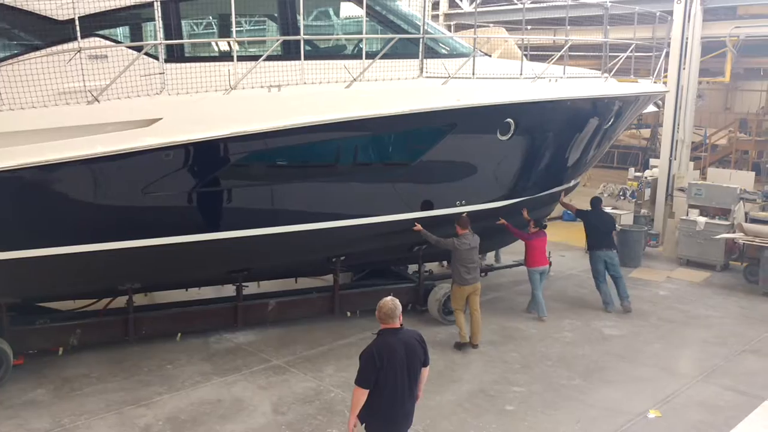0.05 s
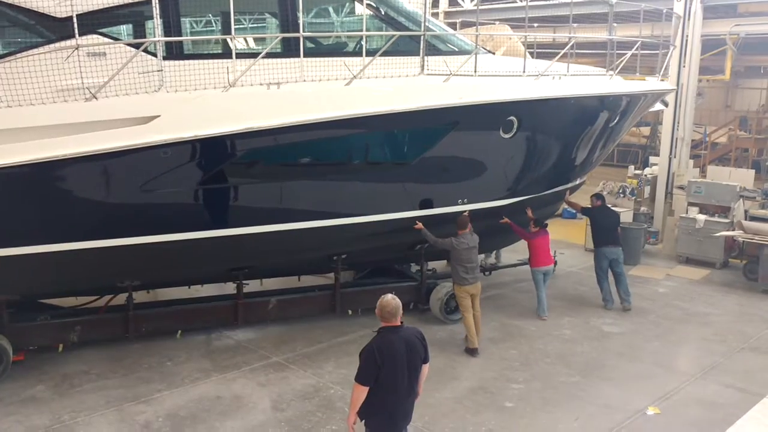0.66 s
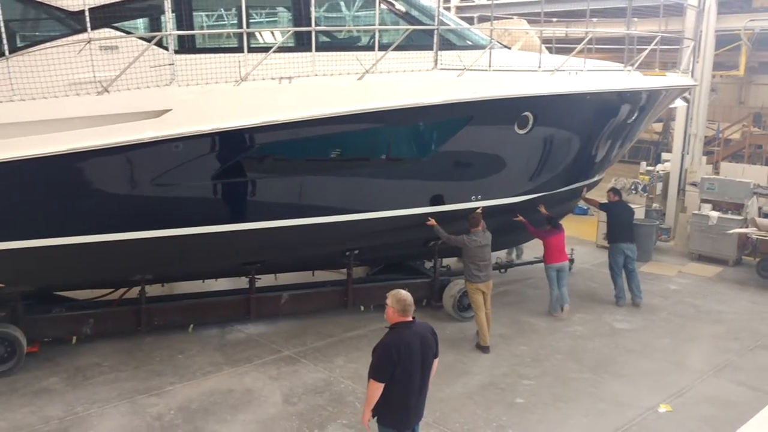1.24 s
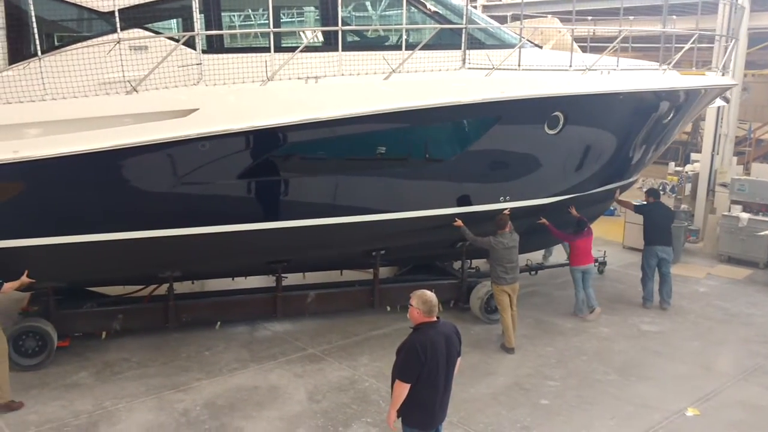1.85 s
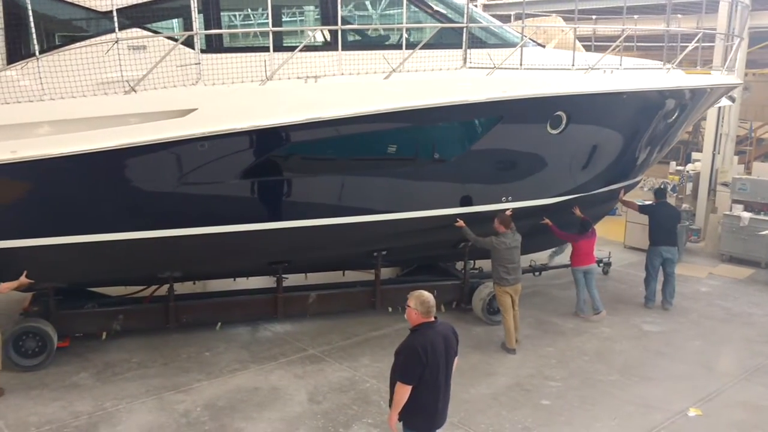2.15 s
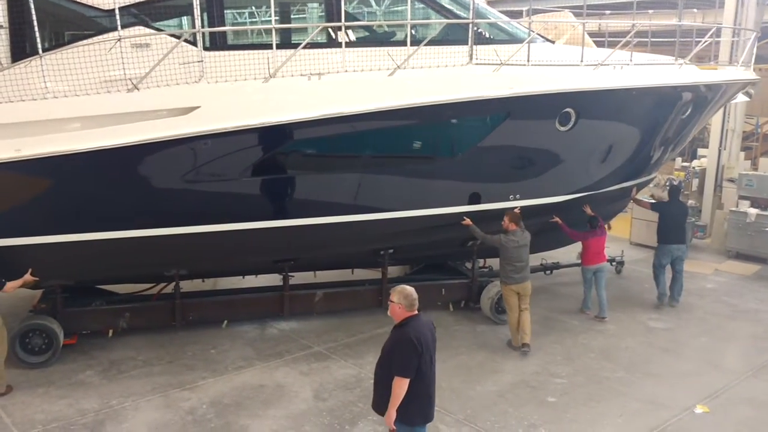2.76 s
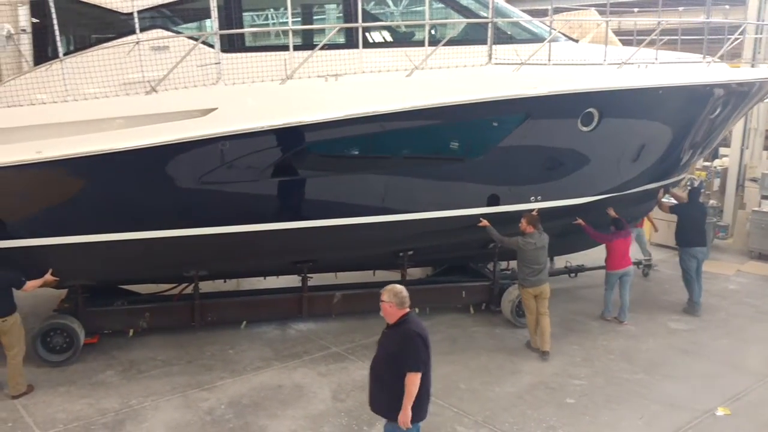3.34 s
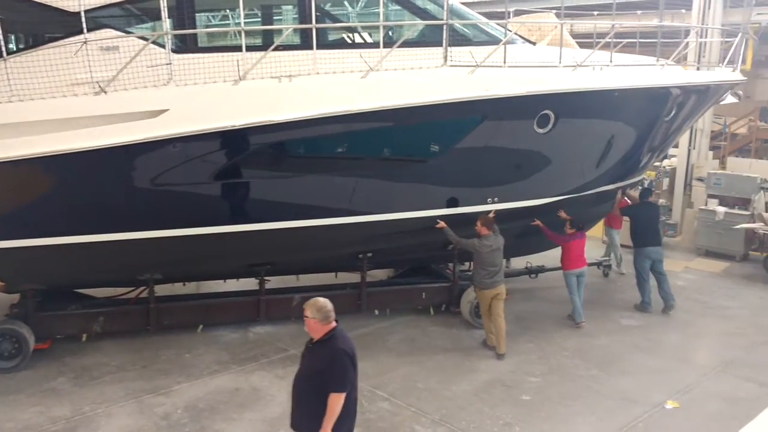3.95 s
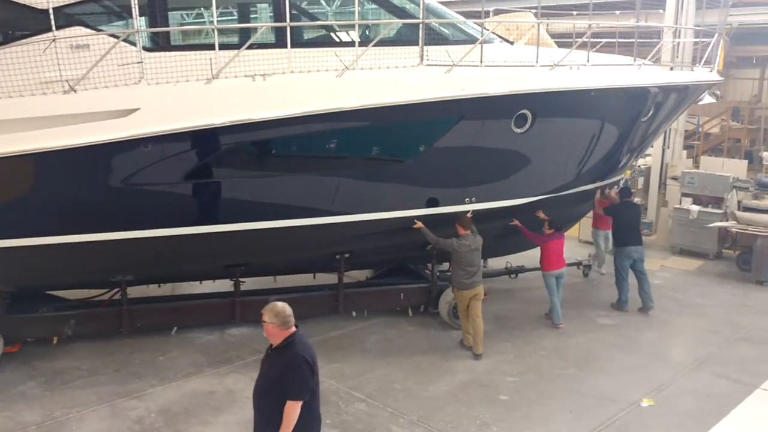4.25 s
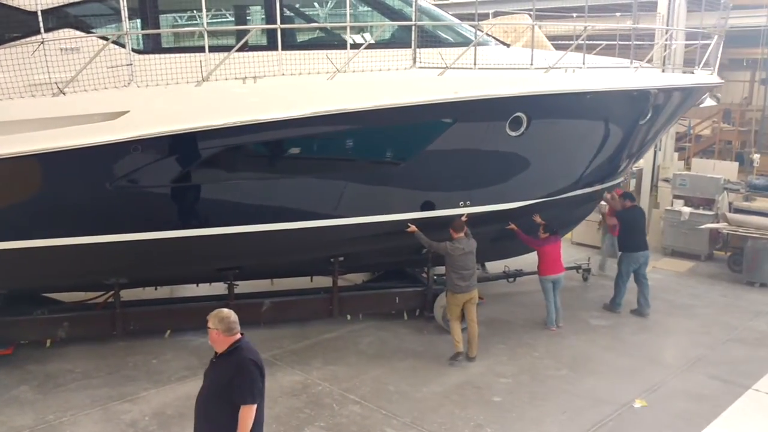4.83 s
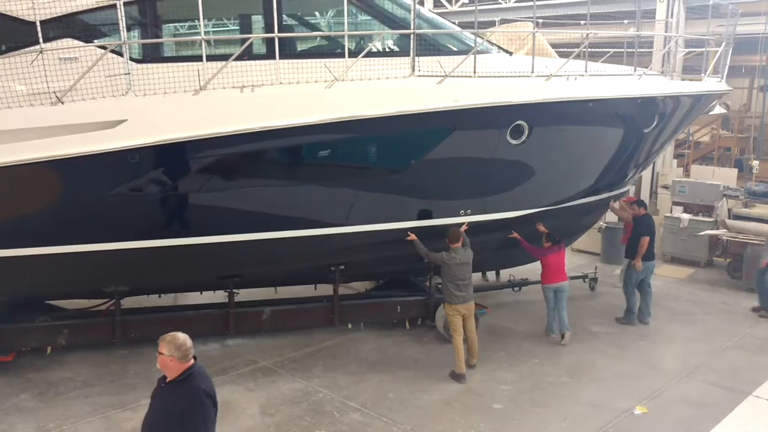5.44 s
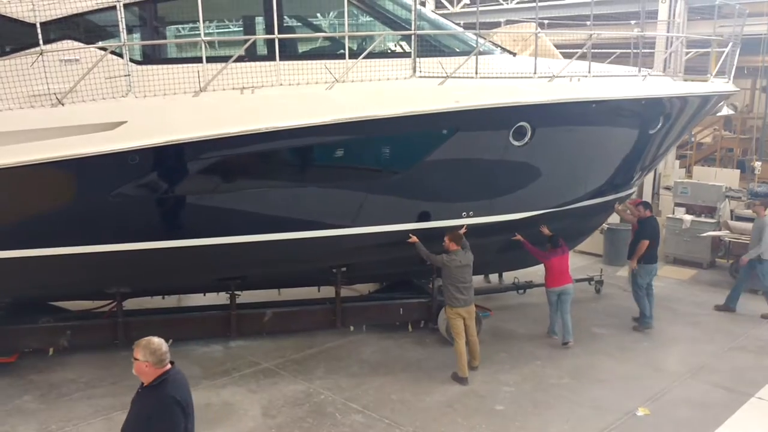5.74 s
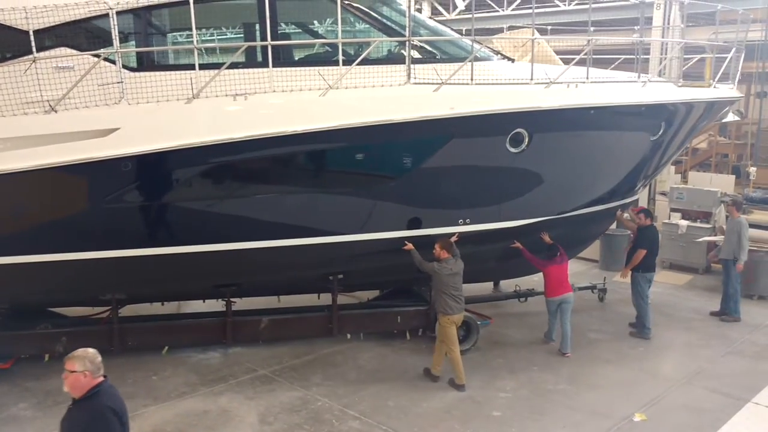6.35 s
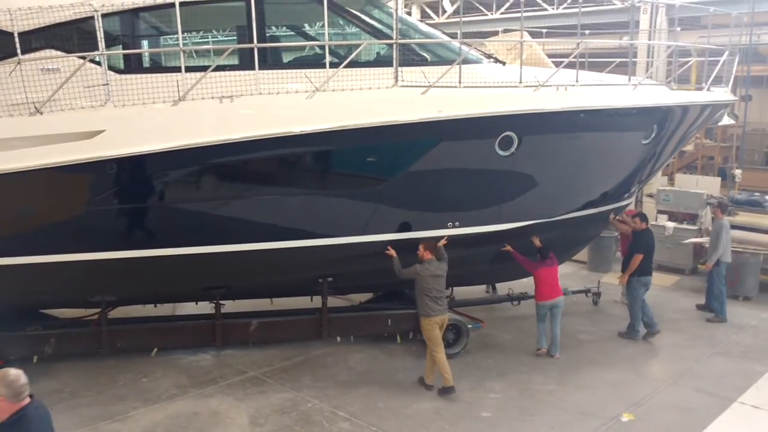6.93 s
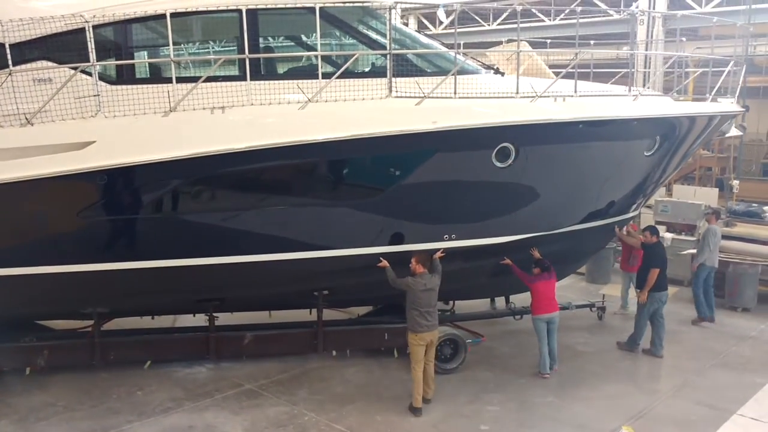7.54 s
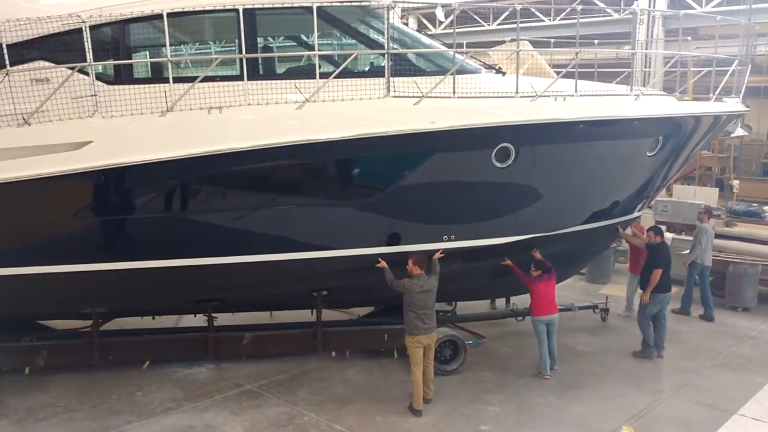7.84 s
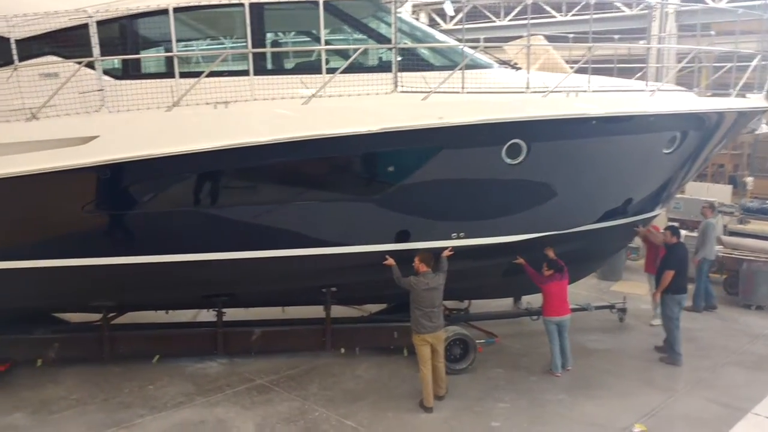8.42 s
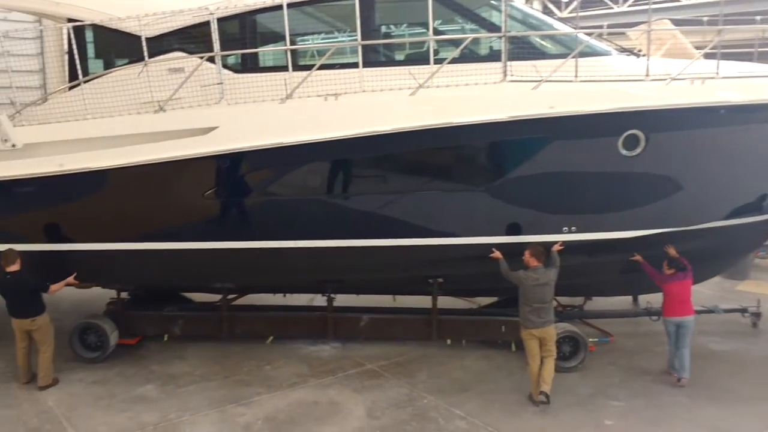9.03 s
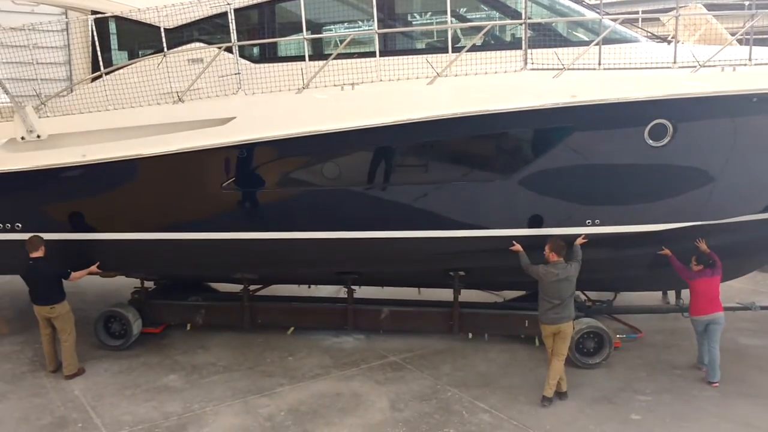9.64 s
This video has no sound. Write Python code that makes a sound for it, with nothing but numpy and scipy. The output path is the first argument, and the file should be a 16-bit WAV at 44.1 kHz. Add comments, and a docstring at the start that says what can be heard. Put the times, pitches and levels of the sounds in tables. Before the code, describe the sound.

A continuous bright hiss and hollow rush of air escapes beneath a boat's hull, with a few brief spurts and an early rumble.

```python
"""A factory floor, heard through a phone's two microphone ports as a large boat floats by on air casters.
Compressed air leaks from under their skirts: a hollow roar from the gap below the hull, a bright hiss,
at first the low rumble of a fluttering skirt, now and then a spurt or the squeak of a seal. Farther off
the hall drones and motors hum. The ports spread the hiss wide, and the phone's gain control ducks
after the sharpest sounds."""
import sys
import numpy as np
from scipy import signal
from scipy.fft import rfft, irfft, next_fast_len
from scipy.io import wavfile
from scipy.ndimage import uniform_filter1d, minimum_filter1d

SR = 44100
rng = np.random.default_rng(int(sys.argv[2]) if len(sys.argv) > 2 else 0)


def unload_audio(sound):
    """Save the sound as a 16-bit wav file, at the path given as the first command line argument."""
    columns = np.transpose(np.atleast_2d(sound))
    # keep every value between -1 and 1, then stretch to whole-number steps
    steps = np.round(np.clip(columns, -1, 1) * 32767)
    wavfile.write(sys.argv[1], SR, steps.astype(np.int16))


N = 426888
TIME, FREQ = np.arange(N) / SR, np.maximum(np.arange(N // 2 + 1) * SR / N, 1)
TOP_HZ = 15350  # upper edge of the phone's range


def undb(db):
    """Decibels to gain."""
    return np.exp(np.asarray(db) * np.log(10) / 20)


def over_time(rows, column=1):
    """One column of a curve at every sample."""
    rows = np.array(rows)
    return np.interp(TIME, rows[:, 0], rows[:, column])


def over_freq(rows):
    """A spectrum's level at every frequency."""
    rows = np.array(rows)
    return np.interp(np.log(FREQ), np.log(rows[:, 0]), rows[:, 1])


def bell(x, centre, width):
    """A smooth hump of height 1 and the given width at half height."""
    return np.exp2(-np.minimum((2 * (x - centre) / width) ** 2, 60))


def walk(rate):
    """Random levels, rate a second, joined by straight lines; spread near 1."""
    return np.interp(TIME * rate, np.arange(512), 1.2 * rng.standard_normal(512))


# The microphone ports swing in and out of phase along the spectrum. Each row: frequency in Hz,
# likeness from -1 opposed to 1 alike (held flat beyond), lead of the right port up to the next row.
PORT_PHASE = [(30, .3, .5), (470, .5, 0), (700, .9, 0), (1330, 1.0, .3), (2515, -1.12, -.2),
              (3690, 1.03, .1), (4960, -.985, -.2), (6220, .86, .33), (7620, -.89, -.36), (8900, .95, .46),
              (10030, -.97, -.47), (11130, .92, .3), (12450, -.85, 0), (13750, .5, 0), (15250, -.6, 0)]
# Balance at the phone. Each row: frequency in Hz, left minus right in dB.
PORT_BALANCE = [(70, 5), (115, 0), (170, 2.2), (300, -.9), (800, .2), (1400, 0), (1800, -1.2), (2300, 0),
                (3800, .2), (4600, 1.3), (5400, -2.2), (6000, -.7), (6900, -2.5), (8500, -2), (9300, -.2),
                (11600, -2.3), (13000, -.4)]


def noise_at_ports():
    """Spectrum of white noise, 0 dB per Hz, as it reaches the left and right port."""
    left, unrelated = rfft(rng.standard_normal((2, N))) * np.sqrt(SR / 2)
    hz, alike, lead = np.array(PORT_PHASE).T
    part, row = np.modf(np.interp(FREQ, hz, np.arange(len(hz))))
    eased_row = row + (1 - np.cos(np.pi * part)) / 2
    swing = np.clip(np.interp(eased_row, np.arange(len(hz)), alike), -.99997, .99997)
    # the air comes from one side, which turns the phase in between
    likeness = swing + 1j * lead[row.astype(int)] * np.sin(np.pi * part) * np.sqrt(1 - swing ** 2)
    right = likeness * left + np.sqrt(np.maximum(1 - abs(likeness) ** 2, 0)) * unrelated
    return np.array([left, right]) * undb(np.outer([.5, -.5], over_freq(PORT_BALANCE)))


# Room tone, all around the phone. Each row: frequency in Hz, level in dB per Hz.
HALL_SPECTRUM = [(20, -100), (60, -81), (125, -73.5), (200, -68.5), (400, -70.5), (600, -75), (1500, -104)]


def hall_drone():
    """The steady low noise of the hall."""
    return irfft(noise_at_ports() * undb(over_freq(HALL_SPECTRUM)), N)


# Motors farther off in the hall.
# Each row: loudest moment in seconds, length in seconds, pitch in Hz, peak level in dB.
MOTOR_RUNS = [(4.6, 7, 118.5, -55), (6.2, 3.4, 203, -50.5), (7.58, 0.9, 291, -44.5), (4.2, 1.3, 398, -48.5),
              (5.7, 1, 398, -45.5)]


def motors(waver_db=1.0, waver_hz=0.59):
    """Each motor swells and fades, humming faintly and unevenly."""
    out = 0
    for at, length, hz, db in MOTOR_RUNS:
        tone = np.sin(2 * np.pi * np.cumsum(hz + waver_hz * walk(9)) / SR)
        out = out + undb(db + waver_db * walk(1.95)) * bell(TIME, at, length) * tone
    return out


def reflections(x, echo_db=-18, wander_s=0.00025, count=6):
    """Echoes off hull and floor comb the sound finely; the combs slide as boat and phone move."""
    bright = signal.sosfilt(signal.butter(1, 900, "high", fs=SR, output="sos"), x)
    out = x
    for lag_s in np.geomspace(.006, .024, count):
        then = TIME - lag_s - wander_s * walk(.7)
        out = out + undb(echo_db) * np.array([np.interp(then, TIME, side, left=0) for side in bright])
    return out


# Resonances between hull and floor, heard from outside the gap. Each row: first and last centre
# in Hz, width in Hz, first and last lift in dB.
GAP_RESONANCES = [(116.6, 120, 15, 4, 3), (175, 194, 73, 0.5, 2), (412, 387, 89, 5, 3.5),
                  (735, 726, 84, 2, 3), (825, 830, 60, -0.5, -0.8), (931, 937, 123, 5, 4),
                  (1085, 1085, 69, -1.5, -1.5), (1307, 1240, 163, 5.5, 3), (1476, 1400, 170, 3, -0.8),
                  (1800, 1850, 140, 3.5, 0)]


def under_hull(x):
    """The gap rings; as the boat glides, its resonances fade from their first to their last shape."""
    first_db = sum(db * bell(FREQ, hz, width) for hz, _, width, db, _ in GAP_RESONANCES)
    last_db = sum(db * bell(FREQ, hz, width) for _, hz, width, _, db in GAP_RESONANCES)
    spectrum, travel = rfft(x), TIME / TIME[-1]
    first, last = irfft(spectrum * undb(first_db), N), irfft(spectrum * undb(last_db), N)
    return (1 - travel) * first + travel * last


# A skirt fluttering down at the floor. Each row: frequency in Hz, level in dB per Hz.
SKIRT_SPECTRUM = [(30, -99), (75, -83), (110, -63.5), (170, -60.5), (250, -55), (340, -59), (430, -74),
                  (560, -80), (1000, -99)]
# How strongly it flutters. Each row: time in seconds, gain in dB.
SKIRT_FLUTTER = [(0, 6.5), (.12, -4), (.5, -1.5), (.9, 1), (1.4, 2), (1.75, 1), (2.05, -2), (2.4, -2),
                 (2.7, -6.5), (3.1, -20), (3.7, -10.5), (4.1, -22), (6.4, -22), (6.9, -10), (7.3, -17),
                 (8.4, -23), (9.68, -13)]


def skirt_rumble():
    """A skirt flutters on the floor and rumbles, mostly in the first seconds."""
    rumble = irfft(noise_at_ports() * undb(over_freq(SKIRT_SPECTRUM)), N)
    return rumble * undb(over_time(SKIRT_FLUTTER))


# Rubber seals, a touch left of the microphone. Each row: middle in seconds, glide length in seconds,
# start and end pitch in Hz, peak level in dB.
SEAL_SQUEAKS = [(2.694, 0.014, 12000, 11200, -24.5), (2.708, .024, 13300, 12300, -25.5),
                (5.884, .005, 10900, 10500, -20), (5.906, 0.0126, 8850, 7900, -13.5),
                (5.919, 0.013, 8300, 7700, -21)]


def squeaks(right_lag_s=.00003):
    """A seal snaps against the floor and gives a tiny falling whistle."""
    out = 0
    for at, length, start_hz, end_hz, db in SEAL_SQUEAKS:
        hz = np.interp(TIME, [at - length / 2, at + length / 2], [start_hz, end_hz])
        turns = np.cumsum(hz) / SR - np.outer([0, right_lag_s], hz)
        out = out + undb(db) * bell(TIME, at, length / 2) * np.sin(2 * np.pi * turns)
    return out


# Short spurts and longer leaks at floor level. Each row: middle in seconds, length in seconds,
# centre in Hz, width in Hz, peak level in dB per Hz.
SKIRT_JETS = [(.6, 1.1, 10700, 1600, -64.5), (2.447, 0.11, 6940, 4000, -70), (2.68, .07, 12300, 3500, -68),
              (2.8, 1.9, 6230, 1100, -65.5), (3.017, 0.028, 6100, 5000, -64),
              (3.21, 0.021, 6040, 5000, -61.5), (4.39, 0.04, 8000, 3000, -63),
              (5.172, 0.047, 6200, 4550, -61), (5.87, 0.087, 10300, 3000, -66),
              (5.895, 0.051, 6500, 4000, -65), (7.074, .04, 9500, 4000, -65),
              (7.78, 0.048, 7000, 7000, -61.5), (8.085, 0.048, 960, 490, -56),
              (8.145, 0.049, 6700, 4800, -54), (8.153, 0.036, 5800, 300, -54),
              (8.145, 0.032, 13700, 700, -73), (8.25, 0.062, 6200, 3540, -54), (9.4, .7, 8400, 1400, -65)]


def spurts():
    """Where a skirt lifts, air jets through a narrow opening, sometimes close to whistling."""
    air, out = irfft(noise_at_ports(), N), np.zeros((2, N))
    for at, length, hz, width, db in SKIRT_JETS:
        near = np.flatnonzero(abs(TIME - at) < 2 * length)
        size = next_fast_len(len(near))
        freq = np.maximum(np.fft.rfftfreq(size, 1 / SR), 1)
        band = bell(np.log(freq / hz), 0, width / hz)
        puff = irfft(rfft(air[:, near], size) * np.sqrt(band), size)[:, :len(near)]
        out[:, near] += undb(db) * puff * np.sqrt(bell(TIME[near], at, length))
    return out


# The leak drifts as the boat glides by. Each row: time in seconds, roar gain in dB, hiss gain in dB.
LEAK_DRIFT = [(0.1, 0, 0), (.3, 0.1, 0.2), (.7, -1.1, -1), (1.6, -1, -1.4), (2.8, -1.1, -0.4),
              (3.65, 1.6, 1), (4.1, 1, 1), (5.3, -0.6, -0.2), (6.1, 0, 0.5), (6.7, 0.9, 1.2),
              (7.5, 2.3, 2.2), (7.9, 1.3, 2.3), (8.65, -0.4, -0.5), (9.08, 0, -0.8), (9.68, -0.5, -3.5)]
# A caster vents its cushion. Each row: middle in seconds, length in seconds, lift of the roar in dB.
VENT_SURGES = [(.02, 0.041, 1.5), (0.895, 0.14, 2), (2.084, 0.049, 3.5), (2.415, 0.16, 1.4),
               (2.62, 0.19, 1.7), (4.183, 0.047, 1.5), (4.493, 0.3, 1.5), (4.88, 0.081, 2),
               (5.462, 0.042, 3.5), (5.658, 0.067, 1.5), (8.078, 0.078, 2), (9.11, 0.18, 2),
               (9.41, 0.12, 3.5), (9.644, 0.09, 4)]
# A skirt settles and seals. Each row: middle in seconds, length in seconds, drop of the roar in dB.
SEALING_LULLS = [(0.126, 0.086, 3), (2.265, .07, 1.5), (4.03, 0.12, 2), (4.27, 0.071, 1.5),
                 (4.68, 0.048, 1), (7.188, 0.091, 1.5), (7.7, 0.092, 3), (8.78, 0.06, 1.8)]


def flow_db(wobble_db=0.48, wobble_per_s=40, hiss_share=0.87):
    """Gains of roar and hiss: slow drift, then surges, lulls and a wobble that the hiss partly follows."""
    surge_db = sum(db * bell(TIME, at, length) for at, length, db in VENT_SURGES)
    lull_db = sum(db * bell(TIME, at, length) for at, length, db in SEALING_LULLS)
    swing_db = surge_db - lull_db + wobble_db * walk(wobble_per_s)
    return over_time(LEAK_DRIFT, 1) + swing_db, over_time(LEAK_DRIFT, 2) + hiss_share * swing_db


# The main leak under the skirts, in the foreground. Each row: frequency in Hz, level in dB per Hz.
LEAK_SPECTRUM = [(20, -104), (125, -81), (200, -77.5), (480, -68.5), (620, -59), (1600, -60.5),
                 (2600, -61.5), (3600, -65.5), (4900, -64), (6000, -63.5), (7900, -64), (10000, -64),
                 (11200, -66), (12600, -71.5), (14000, -74.5), (15500, -79.5)]


def caster_leak(drift_db=-0.23, flicker_db=0.74, flicker_per_s=36, bands=8):
    """Escaping air: eddies of each size surge with the flow, swell slowly and flicker on their own."""
    air = noise_at_ports() * undb(over_freq(LEAK_SPECTRUM))
    roar_db, hiss_db = flow_db()
    centres = np.geomspace(400, TOP_HZ, bands)
    out = 0
    for hz, share in zip(centres, np.eye(bands)):
        eddies = irfft(air * np.interp(FREQ, centres, share), N)
        fine = np.interp(hz, [1200, 4000], [0, 1])  # big eddies roar, small ones hiss
        unrest_db = drift_db * walk(0.44) + flicker_db * walk(flicker_per_s)
        out = out + eddies * undb(roar_db + fine * (hiss_db - roar_db) + unrest_db)
    return out


def scene():
    """From where the phone is held: all the air around the boat, over the hum of the hall."""
    hollow_air = under_hull(skirt_rumble() + hall_drone() + caster_leak())
    return reflections(hollow_air + spurts()) + squeaks() + motors()


def gain_control(x, threshold_db=-20.0, slope=0.73, attack_s=0.005, hold_s=0.25, release_db_per_s=10):
    """Sharp treble peaks pull the phone's gain down; it holds, then climbs back slowly."""
    treble_power = np.mean(np.diff(x, prepend=0) ** 2, axis=0)
    treble_db = 10 * np.log10(np.maximum(uniform_filter1d(treble_power, size=160), 1e-12))
    cut_db = slope * np.maximum(treble_db - threshold_db, 0)
    hold = int(hold_s * SR)
    held_db = -minimum_filter1d(-cut_db, hold, origin=(hold - 1) // 2)
    climb_db = release_db_per_s * TIME
    released_db = np.maximum.accumulate(held_db + climb_db) - climb_db
    pole = np.exp(-1 / (attack_s * SR))
    return x * undb(-signal.lfilter([1 - pole], [1, -pole], released_db))


def record(dry):
    """The phone rides the gain and cuts the top."""
    low_pass = signal.ellip(10, .1, 80, TOP_HZ, fs=SR, output="sos")
    return signal.sosfilt(low_pass, gain_control(dry))


dry = scene()
out = record(dry)
unload_audio(out)
```